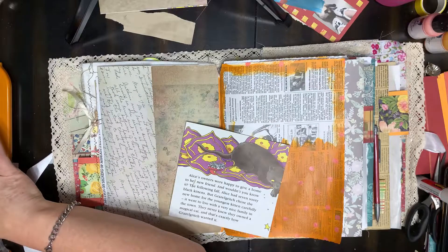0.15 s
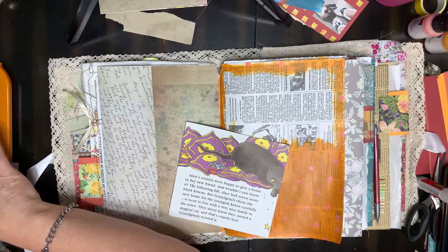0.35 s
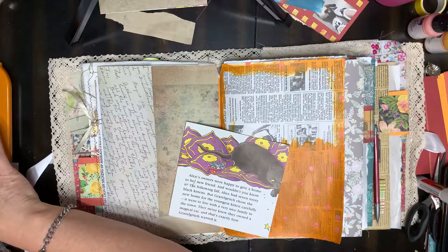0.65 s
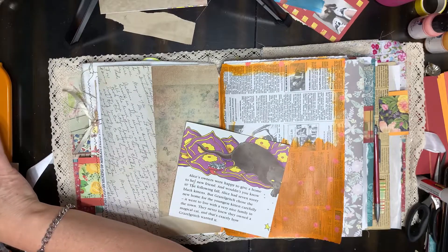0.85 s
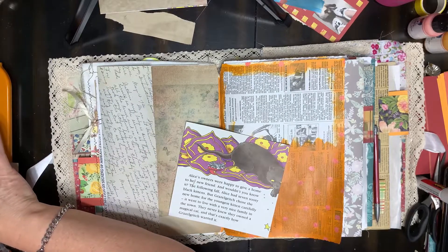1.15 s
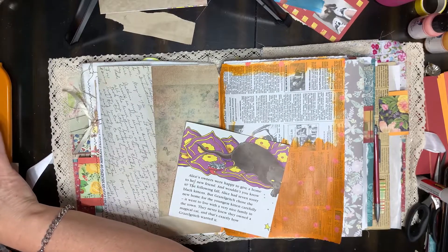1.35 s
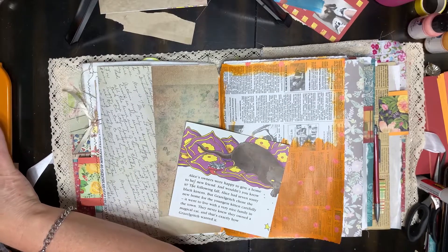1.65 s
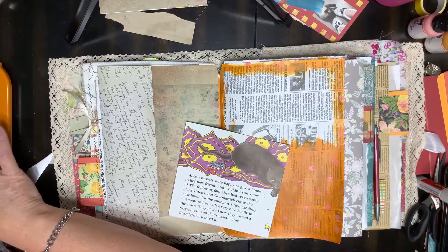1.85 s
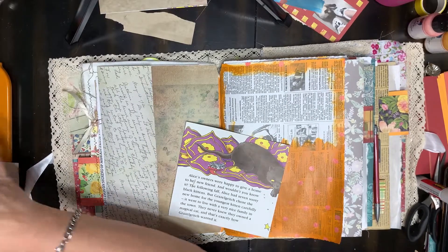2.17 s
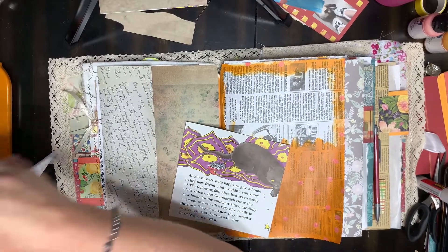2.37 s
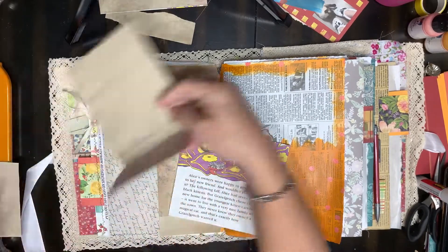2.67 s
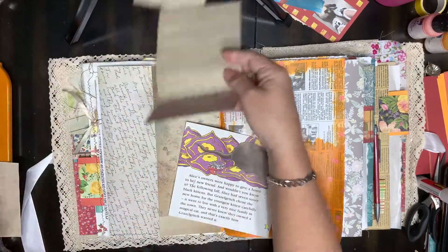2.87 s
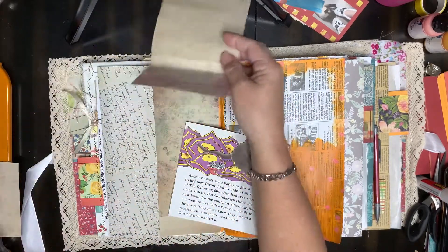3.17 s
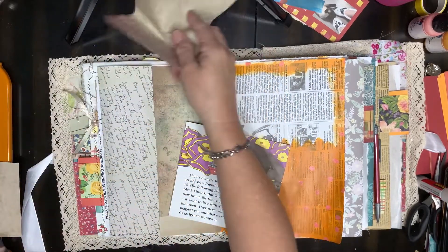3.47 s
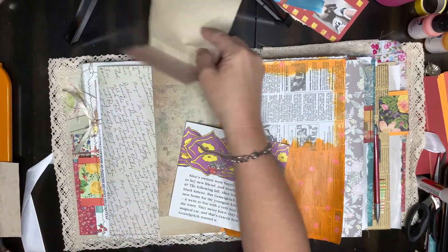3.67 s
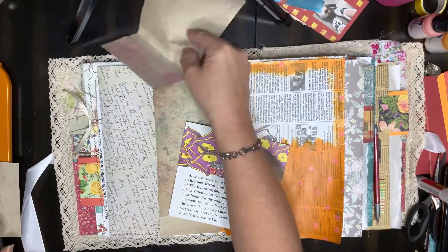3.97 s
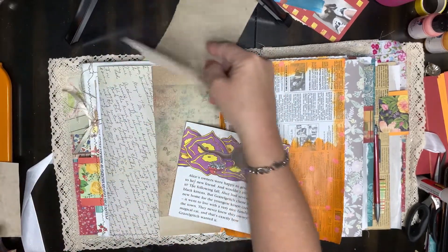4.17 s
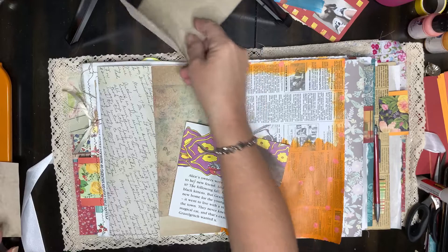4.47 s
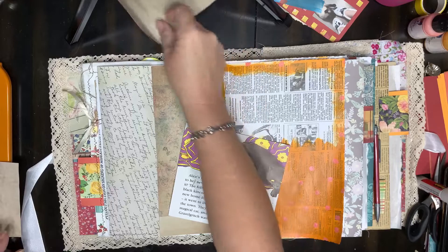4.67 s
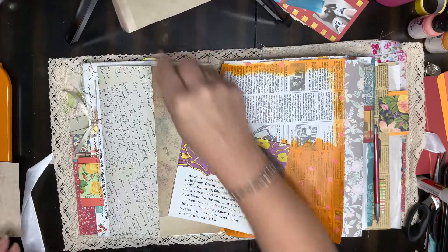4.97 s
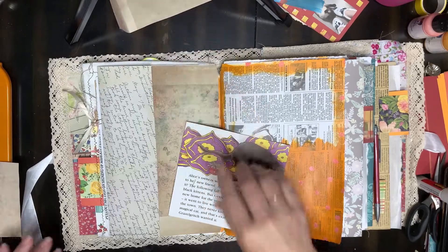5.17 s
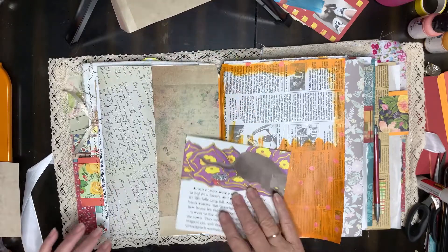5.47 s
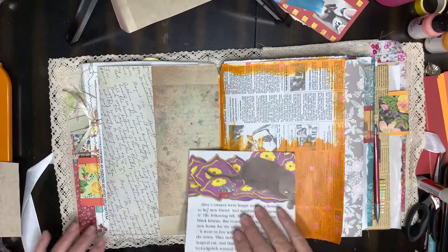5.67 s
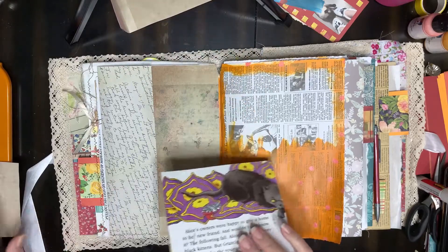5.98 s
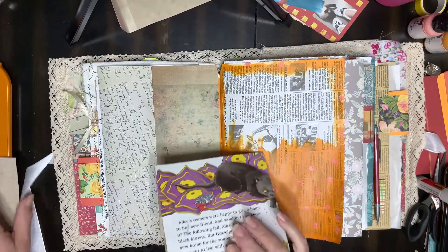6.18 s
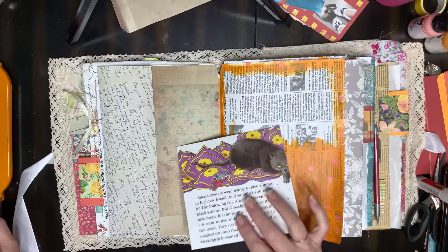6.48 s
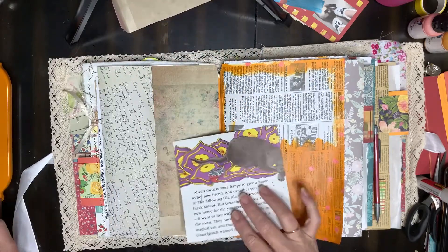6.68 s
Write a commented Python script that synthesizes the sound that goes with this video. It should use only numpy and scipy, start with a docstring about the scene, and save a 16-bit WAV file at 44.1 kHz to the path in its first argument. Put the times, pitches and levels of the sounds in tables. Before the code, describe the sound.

Crisp crackling and popping of handled paper swells over a faint room hum, then settles into light, dry papery brushes.

```python
"""Sheets of stiff craft paper are pulled, folded and laid down on a desk in a quiet room.
From the start, filtered noise makes room rumble, room tone, hiss and a far fan hum; a faint tone wavers twice.
From 0.5 s strokes of the hands shape grainy noise: paper slides, flexes and crackles, with a short room tail.
Soon creases buckle, each a noise crack with a ringing panel, loudest from 1.3 to 4 s.
From 0.75 to 4.4 s noise through three low resonances makes a desk boom; lighter strokes and a few snaps follow."""
import sys
import numpy as np
from scipy import signal
from scipy.fft import rfft, irfft, next_fast_len
from scipy.io import wavfile
from scipy.ndimage import uniform_filter1d

SR = 44100
rng = np.random.default_rng(int(sys.argv[2]) if len(sys.argv) > 2 else 0)


def generate_wav(signal):
    """Clip the signal to [-1, 1] and save it as 16-bit WAV at the path in sys.argv[1]."""
    frames = np.transpose(np.atleast_2d(signal))
    scaled = np.clip(frames, -1, 1) * 32767
    pcm = np.round(scaled).astype(np.int16)
    wavfile.write(sys.argv[1], SR, pcm)


N = 301203  # samples


def gain_of(db):
    """Decibel law: amplitude ratio of a level."""
    return 10 ** (np.asarray(db) / 20)


def evened(x):
    """Normalization to unit root mean square."""
    return x / np.sqrt(np.mean(x ** 2) + 1e-20)


def read(points, hz):
    """Interpolation of a curve along a logarithmic frequency axis."""
    f, value = np.transpose(points)
    return np.interp(np.log(hz + 1), np.log(f + 1), value)


def add(mix, s, sound):
    """Superposition: add a sound to the mix from time s, cut at its end."""
    part = mix[round(s * SR):][:len(sound)]
    part += sound[:len(part)]


def colour(x, points):
    """Minimum-phase filtering: the Hilbert relation gives a causal response from the magnitude alone."""
    log_gain = np.log(gain_of(read(points, abs(np.fft.fftfreq(4096, 1 / SR)))))
    taps = np.fft.ifft(np.exp(np.conj(signal.hilbert(log_gain)))).real[:2048]
    return signal.oaconvolve(x, taps)[:len(x)]


def resonate(x, hz, width):
    """Simple resonance of gain 1: a one-pole lowpass shifted up to the mode's frequency."""
    turn = np.exp(2j * np.pi * hz * np.arange(len(x)) / SR)
    r = np.exp(-np.pi * width / SR)
    return 2 * (turn * signal.lfilter([1 - r], [1, -r], x / turn)).real


def patchy(x, patchy_db, size=512):
    """Time-varying modal radiation: other parts of the sheet ring from moment to moment."""
    z = signal.stft(x, nperseg=size)[2]
    patches = uniform_filter1d(rng.standard_normal(z.shape[::-1]), size=10, axis=0)  # along time
    patches = evened(uniform_filter1d(patches, size=2, axis=1))  # along frequency
    return evened(signal.istft(z * gain_of(patchy_db * patches.T), nperseg=size)[1][:N])


def grains(per_s, spread_db, t60, smooth):
    """Stick-slip: small slips of random size, each a dying puff of noise, over a smooth share."""
    size = gain_of(spread_db * np.minimum(rng.exponential(1, N), 4))
    slips = size * (rng.random(N) < per_s / SR)
    puffs = signal.lfilter([1], [1, -gain_of(-60 / (t60 * SR))], slips)
    return rng.standard_normal(N) * (smooth + evened(puffs))


# Spectrum of the room rumble: (frequency [Hz], relative density [dB per Hz])
RUMBLE_SPECTRUM = [(28, -32), (45, -3.5), (65, -2), (110, -1.5), (165, -22), (210, -38), (400, -22.5),
                   (700, -59.5)]
# Spectrum of the room tone: (frequency [Hz], relative density [dB per Hz])
ROOM_TONE_SPECTRUM = [(250, -20), (400, 0), (1000, -14), (2500, -7), (4000, -11), (5000, -30)]
# Resonances of the fan hum: (frequency [Hz], bandwidth [Hz], level [dB])
FAN_HUM = [(142.7, 3.7, -70.5), (92, 7.2, -76)]
RUMBLE_DB, ROOM_TONE_DB, HISS_DB = -67.5, -83, -81


def air():
    """Stationary random noise: room rumble and tone, microphone hiss, and narrow bands for the fan hum."""
    noise = rng.standard_normal((3 + len(FAN_HUM), N))
    rumble = gain_of(RUMBLE_DB) * evened(colour(noise[0], RUMBLE_SPECTRUM))
    hiss = colour(noise[1], [(2500, 4.5), (4500, -0.5), (14500, -3.0), (16000, -29)])
    tone = gain_of(ROOM_TONE_DB) * evened(colour(noise[2], ROOM_TONE_SPECTRUM))
    hum = sum(gain_of(db) * evened(resonate(v, hz, width)) for v, (hz, width, db) in zip(noise[3:], FAN_HUM))
    return rumble + tone + hum + gain_of(HISS_DB) * evened(hiss)


# Two passages of a faint tone: (time [s], frequency [Hz], level before its random wavering [dB])
FAINT_TONE = [
    [(0.24, 316, -60.5), (0.398, 263, -78.5), (0.62, 304, -60.5)],
    [(2.98, 303, -80.5), (3.076, 309, -61.5), (3.22, 290, -76)],
]


def waver():
    """Frequency and amplitude modulation: the phase of a faint sine is the integral of its moving pitch."""
    out = np.zeros(N)
    for s, hz, db in map(np.transpose, FAINT_TONE):
        t = np.arange(s[0], s[-1], 1 / SR)
        tone = np.sqrt(2) * np.sin(2 * np.pi * np.cumsum(np.interp(t, s, hz)) / SR)
        add(out, s[0], gain_of(np.interp(t, s, db)) * tone * signal.windows.tukey(len(t), .3))
    wander = evened(uniform_filter1d(rng.standard_normal(N), size=900))
    return out * gain_of(6 * wander - 4)


# Strokes of the hands: (start [s], rise [s], hold [s], sliding [dB], top end against sliding [dB],
# flexing against sliding [dB], depth against flexing [dB])
HAND_STROKES = [(0.499, 0.018, 0.0045, -68, -8, -8, -17), (0.632, 0.033, 0.07, -79.5, -5, 17.5, 16.5),
                (0.716, 0.032, 0.29, -56.5, 0, -3, 22), (0.753, 0.4, 0.11, -42.5, 1.5, -3, 11),
                (1.306, 0.024, 0.16, -59, -36, 2, 3), (1.725, 0.085, 0.064, -62, -5, 7, 10.5),
                (2.232, 0.056, 0.12, -48, -1, 1.5, 5.5), (2.395, 0.13, 0.012, -51, 1.5, -9, 17),
                (2.602, 0.037, 0.054, -70.5, 0, -1, 20.5), (2.741, 0.033, 0.11, -49.5, -0.5, -7.5, 12.5),
                (3.093, 0.035, 0.015, -61.5, 0.5, 2.5, 12.5), (3.146, 0.12, 0.032, -44.5, -5, -3, 6),
                (3.315, 0.024, 0.021, -36.5, -1, 1, 12), (3.43, 0.016, 0.016, -48, 2, 2, -19),
                (3.516, 0.022, 0.1, -51.5, -3, -7.5, 20), (3.642, 0.025, 0.035, -49, -6, 5.5, 5),
                (3.79, 0.017, 0.13, -54.5, 2.5, 2.5, 10.5), (3.968, 0.019, 0.12, -48, 0, -0.5, 7),
                (4.149, 0.077, 0.016, -57.5, 2.5, 0.5, -2), (4.214, 0.068, 0.28, -56.5, 0, -2.5, -41),
                (4.596, 0.04, 0.013, -51.5, -2, -8, -1), (4.713, 0.013, 0.013, -64, -5.5, 1, 8),
                (5.147, 0.0076, 0.0047, -70.5, -4.5, -27, -6), (5.309, .01, 0.714, -88.5, -4, 11.5, -23),
                (5.277, 0.16, 0.01, -55, -10.5, -9.5, -20), (5.542, 0.083, 0.017, -59, -3.5, -7.5, 12),
                (5.684, 0.029, 0.0083, -65, -8, -6, 8), (6.05, 0.047, 0.13, -58.5, -4.5, -7, 8.5),
                (6.19, 0.071, 0.02, -53, 0.5, -7, -1), (6.323, 0.013, 0.029, -52, -8.5, -8, -5),
                (6.381, 0.018, 0.054, -60.5, -3.5, -7.5, 0), (6.487, 0.034, 0.042, -56.5, -2.5, -5, -26),
                (6.553, 0.035, 0.14, -66.5, -12, -5.5, -11), (6.709, 0.079, .05, -54.5, -7, -9.5, 7)]
# Release rates in the columns (sliding, top end, flexing, depth) [dB per s]
RELEASE_DB_PER_S = [200, 262.5, 200, 190]
# Rustle after a snap: (sliding, top end) against the crack, (flexing, depth) against the ring [dB]
SETTLE_DB = [-31.5, -38, -13.5, -9.5]
SETTLE_HOLD_S = 0.00093
RISE_CURVE = 1.77  # power of time by which a stroke swells


def handling():
    """Addition of incoherent powers: strokes swell, hold and die, and snaps leave the sheet settling."""
    power = np.zeros((4, N + SR * 2))  # sliding, top end, flexing, depth
    t = np.arange(SR * 2) / SR
    moves = [(s, rise, hold, [db, db + top_db, db + flex_db, db + flex_db + depth_db])
             for s, rise, hold, db, top_db, flex_db, depth_db in HAND_STROKES]
    moves += [(s + swell, .003, SETTLE_HOLD_S, np.add(SETTLE_DB, [db, db, db + ring_db, db + ring_db]))
              for s, swell, db, hz, ring_db in buckles()]
    for s, rise, hold, dbs in moves:
        swell = np.minimum(t / rise, 1) ** RISE_CURVE
        after = np.maximum(t - rise - hold, 0)
        for row, db, fall_db in zip(power, dbs, RELEASE_DB_PER_S):
            add(row, s, (swell * gain_of(db - fall_db * after)) ** 2)
    return np.sqrt(power[:, :N])


# Spectrum of the slide's body: (frequency [Hz], relative density [dB per Hz])
SLIDE_SPECTRUM = [(1500, -20), (2800, -6), (4200, 2.5), (6500, 4), (8500, -9.5), (11000, -15),
                  (15500, -34.5)]
# Spectrum of the slide's top end: (frequency [Hz], relative density [dB per Hz])
TOP_SPECTRUM = [(5000, -32.5), (8500, 12.5), (11000, 11), (13500, 2.5), (15700, 0.5), (16100, -27.5)]


def sliding(gain, top_gain):
    """Stick-slip friction: fibres catch as paper slides on paper, a grainy hiss of varying brightness."""
    fibres = grains(per_s=250, spread_db=3, t60=.04, smooth=1.3)
    body = patchy(colour(fibres, SLIDE_SPECTRUM), patchy_db=3.5)
    top = patchy(colour(fibres, TOP_SPECTRUM), patchy_db=3.5)
    return gain * body + top_gain * top


# Spectrum of the bent sheet: (frequency [Hz], relative density [dB per Hz])
FLEX_SPECTRUM = [(150, -24.5), (300, -11), (600, -5.5), (1200, -1.5), (1700, -1), (2400, -5.5),
                 (3500, -3.5), (6000, -36)]
DEPTH_HZ = 574  # below this the large slow panel modes sound


def flexing(gain, depth_gain):
    """Bending-wave radiation: the bent sheet crackles in its low and middle panel modes."""
    sound = colour(grains(per_s=300, spread_db=3, t60=.014, smooth=1.1), FLEX_SPECTRUM)
    sound = patchy(sound, patchy_db=4.3, size=768)
    low = signal.filtfilt(*signal.butter(2, DEPTH_HZ, fs=SR), sound)
    return gain * (sound - low) + depth_gain * low


TICKS_DB = -8  # small ticks against the flexing


def crackle(gain):
    """Random impulse process: tiny creases tick at random while the sheet is bent."""
    ticks = grains(per_s=160, spread_db=4, t60=.008, smooth=0)
    return gain * gain_of(TICKS_DB) * evened(colour(ticks, FLEX_SPECTRUM))


ROOM_T60 = 0.055  # s


def room(x):
    """Exponential reverberant decay: sparse taps of random sign die away, weak in bass and treble."""
    taps = np.zeros(SR // 2)
    at = np.arange(200, len(taps) - 20, 20)
    signs = rng.choice([-1., 1.], len(at))
    taps[at + rng.integers(0, 20, len(at))] = signs * gain_of(-60 * at / SR / ROOM_T60)
    tail = colour(taps / np.linalg.norm(taps), [(200, -4.0), (2000, 6.5), (14000, -8.0)])
    return signal.fftconvolve(x, tail)[:N]


# Creases that buckle at once: (time [s], relative peak [dB], panel ring [Hz], relative ring over crack [dB])
SUDDEN_CREASES = [(0.555, -60, 1750, 7.5), (0.619, -63, 1716, 9), (0.75, -34.5, 474, -10),
                  (0.812, -38, 977, -14), (0.862, -38, 1638, -2), (1.029, -36.5, 1055, -10),
                  (1.103, -47, 522, 1.5), (1.292, -18, 1342, -14.5), (1.41, -62, 479, 16),
                  (1.451, -12, 2047, -19.5), (1.708, -55, 1570, -1.5), (1.799, -37, 1048, -5.5),
                  (1.899, -41.5, 445, -0.5), (1.917, -47, 1131, 3), (2.023, -42, 1002, -2.5),
                  (2.074, -51.5, 1273, -1.5), (2.24, -42, 1620, -11), (2.255, -35.5, 1067, -8.5),
                  (2.279, -28, 974, -13), (2.358, -8, 3036, -18.5), (2.361, -33, 478, -2.5),
                  (2.48, -50, 874, 2), (2.518, -33, 824, -16), (2.619, -66.5, 622, 18.5),
                  (2.767, -37.5, 907, -3.5), (2.868, -13, 1722, -25), (3.124, -32, 960, -17.5),
                  (3.248, -25.5, 1830, -18), (3.297, -21.5, 1200, -19.5), (3.402, -13, 1131, -15.5),
                  (3.442, -35, 1571, -1.5), (3.513, -41.5, 685, 4), (3.562, -34.5, 1141, -2.5),
                  (3.66, -31, 1968, -10.5), (3.694, -15, 884, -14.5), (3.724, -9, 883, -17),
                  (3.816, -36, 1106, -6), (3.936, -22.5, 1845, -25.5), (3.989, -39.5, 899, 0),
                  (4.006, -19, 1300, -10.5), (4.232, -38, 1899, -15), (4.372, -50, 1019, -7.5),
                  (4.645, -40.5, 1693, -22), (5.319, -53.5, 1510, -9.5), (6.095, -51.5, 716, -14),
                  (6.149, -44.5, 720, -21)]
# Creases that give way gradually: (time [s], relative peak [dB], panel ring [Hz], relative ring over crack [dB])
GRADUAL_CREASES = [(2.044, -67, 581, 20.5), (3.335, -15.5, 1459, -14), (3.361, -27, 1376, -6.5),
                   (3.452, -25.5, 933, -15.5), (3.467, -30.5, 1100, -6.5), (3.585, -23.5, 745, -11.5),
                   (3.851, -26, 930, -18), (3.991, -43, 464.4, 8), (4.009, -24, 1476, -8),
                   (4.068, -23.5, 1309, -14), (4.738, -45, 1101, -16.5)]
GRADUAL_SWELL_S = .006


def buckles():
    """Buckling instability, sudden or gradual: rows of (start s, swell s, peak dB, ring Hz, ring dB)."""
    sudden = [(s, 0, *rest) for s, *rest in SUDDEN_CREASES]
    return sudden + [(s, GRADUAL_SWELL_S, *rest) for s, *rest in GRADUAL_CREASES]


# Spectrum of the crack: (frequency [Hz], relative level [dB])
CRACK_SPECTRUM = [(80, -44.5), (250, -13), (800, -8), (2000, -9), (3300, 3), (6500, 0.5), (9500, -1.5),
                  (13000, -10.5), (16500, -24)]
# Modes of a knocked panel: (nominal multiple of its pitch [ratio], relative level [dB])
PANEL_MODES = [(1, -0.5), (1.7, -8.5), (2.9, -11)]
RING_TURNS = 24  # cycles of the pitch in which a ring with no hollowness falls 60 dB
RATTLE_S, RATTLE_WIDE = .034, .35  # 60 dB decay of the rattle, its bandwidth as a share of pitch
SAG, SAG_S, RISE_TURNS = .3, .005, 1.3  # share by which the ring starts sharp, its settling, cycles of swell
HOLLOW_DB = 24  # toward this ring over crack a tap turns hollow: up to twice as long, without rattle


def snaps():
    """Impulsive excitation of modes: a wide noise crack, then a panel ring that sags to its own pitch."""
    cracks, rings, t = np.zeros(N), np.zeros(N), np.arange(4000) / SR
    for s, swell, db, hz, ring_db in buckles():
        u = np.maximum(t - swell, 0)  # time since the swell ended
        up = np.minimum(t / (swell + 1e-9), 1)
        noise = rng.standard_normal((2, len(t)))
        detune = rng.uniform(0.68, 1.1, len(PANEL_MODES)) ** np.arange(len(PANEL_MODES))
        tail = 0.3 * noise[0] * gain_of(-60 * u / 0.054)
        crack = 1.15 * noise[0] * gain_of(-60 * u / .008) + tail
        crack = crack * up ** 2 * np.minimum(t / .0007, 1)

        hollow = np.clip(ring_db / HOLLOW_DB, 0, 1)
        turns = np.cumsum(hz * (1 + SAG * np.exp(-t / SAG_S))) / SR
        knock, rattle = np.zeros(len(t)), np.zeros(len(t))
        for (k, mode_db), v in zip(PANEL_MODES, detune):
            if k * hz < SR / 3:
                fall_db = 60 * u * hz * np.sqrt(k) / RING_TURNS / (1 + hollow)
                knock += gain_of(mode_db * hollow - fall_db) * np.sin(2 * np.pi * k * v * turns)
        for k, mode_db in PANEL_MODES[:2]:
            rattle += gain_of(mode_db) * resonate(noise[1], k * hz, RATTLE_WIDE * hz)
        rattle = 0.73 * (1 - hollow) * evened(rattle) * gain_of(-60 * u / RATTLE_S)
        ring = (knock + rattle) * up * np.minimum(turns / RISE_TURNS, 1)
        add(cracks, s, gain_of(db) * crack)
        add(rings, s, gain_of(db + ring_db) * ring)
    response = colour(np.eye(1, 2048)[0], CRACK_SPECTRUM)  # its norm removes the filter's noise gain
    return gain_of(-6.0) * colour(cracks, CRACK_SPECTRUM) / np.linalg.norm(response) + gain_of(5.5) * rings


def level(rows):
    """Decibel interpolation: a curve of (s, dB) as a gain, at -120 dB outside its times."""
    return gain_of(np.interp(np.arange(N) / SR, *np.transpose(rows), -120, -120))


# Desk modes: (frequency [Hz], bandwidth [Hz], relative level [dB])
DESK_MODES = [(64, 23, 3), (136, 29, 4), (212, 9.4, -3)]
# Strength of the desk's boom: (time [s], level [dB])
BOOM_LEVEL = [(0.75, -65.5), (0.87, -47), (0.97, -45.5), (1.06, -52), (1.12, -43.5), (1.41, -58.5),
              (1.49, -53), (1.71, -86), (1.81, -57), (2.19, -71.5), (2.36, -50.5), (2.5, -72), (3.27, -67),
              (3.38, -50.5), (3.45, -59.5), (4.22, -64.5), (4.4, -94)]


def desk():
    """Modal resonance: noise through three low modes makes a boom that rises and falls along a level curve."""
    noise = colour(rng.standard_normal(N), [(36, -40), (55, -2.0), (300, -2.5)])
    boom = sum(gain_of(db) * evened(resonate(noise, hz, width)) for hz, width, db in DESK_MODES)
    return level(BOOM_LEVEL) * evened(boom)


# Phase of the right port against the left, linear in frequency: (frequency [Hz], phase [half turns])
PORT_PHASE = [(0, 0), (1000, .15), (1700, 0), (2500, -.4), (3600, -.5), (4650, -1), (17600, -7)]


def ports(x, same, frame):
    """Partial coherence: the right port hears the sound turned in phase, mixed with a random-phase share."""
    z = signal.stft(x, nperseg=frame)[2]
    random_phase = np.exp(2j * np.pi * rng.random(z.shape[::-1]).T)
    scattered = signal.istft(z * random_phase, nperseg=frame)[1][:N]
    scattered = evened(scattered) * np.std(x)
    size = next_fast_len(N + 4096)
    hz = np.fft.rfftfreq(size, 1 / SR)
    like = np.clip(read(same, hz), 0, 1)
    right = like * rfft(x, size) + np.sqrt(1 - like ** 2) * rfft(scattered, size)
    turn = np.exp(1j * np.pi * np.interp(hz, *np.transpose(PORT_PHASE)))
    return np.array([x, irfft(right * turn, size)[:N]])


# Left-right likeness of the paper: (frequency [Hz], coherence [0 to 1])
PAPER_LIKENESS = [(500, 0.93), (1200, 0.93), (2400, 0.82), (3500, 0.85), (4700, .96), (16000, .93)]
# Left-right likeness of air, faint tone and desk: (frequency [Hz], coherence [0 to 1])
AIR_LIKENESS = [(60, 0.98), (250, 0.86), (600, 0.048), (2500, 0.24), (4500, 1), (16000, 1)]


def scene():
    """Superposition of the paper with its room tail and the bed of air, faint tone and desk."""
    slide, top, flex, depth = handling()
    paper = sliding(slide, top) + flexing(flex, depth) + crackle(flex) + snaps()
    near = paper + gain_of(-11.5) * room(paper)
    bed = air() + waver() + desk()
    return ports(near, PAPER_LIKENESS, 256) + ports(bed, AIR_LIKENESS, 2048)


EDGE_HZ = 16600


def record(dry):
    """Band limitation: a linear-phase lowpass removes the highest treble."""
    lowpass = signal.firwin(255, EDGE_HZ, window=("kaiser", 9), fs=SR)
    return signal.oaconvolve(dry, lowpass[None], "same")


dry = scene()
out = record(dry)
generate_wav(out)
```